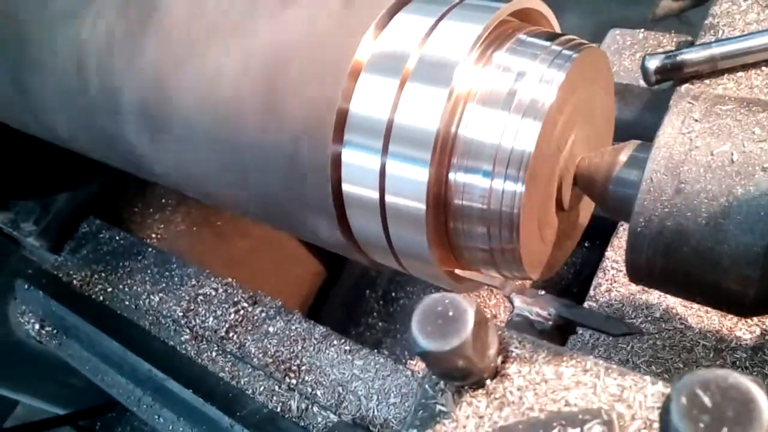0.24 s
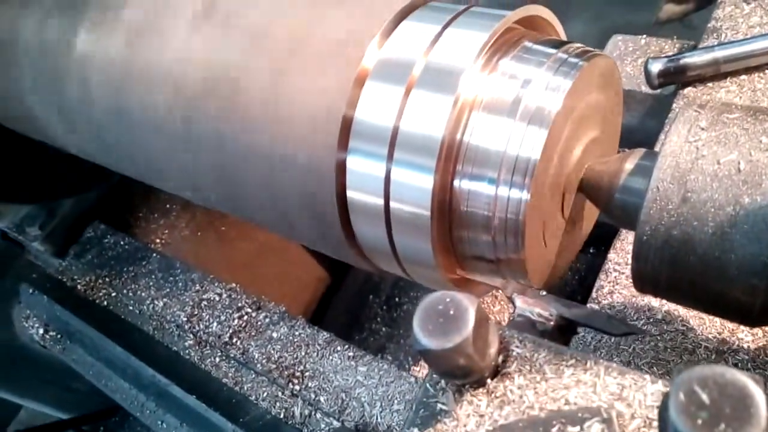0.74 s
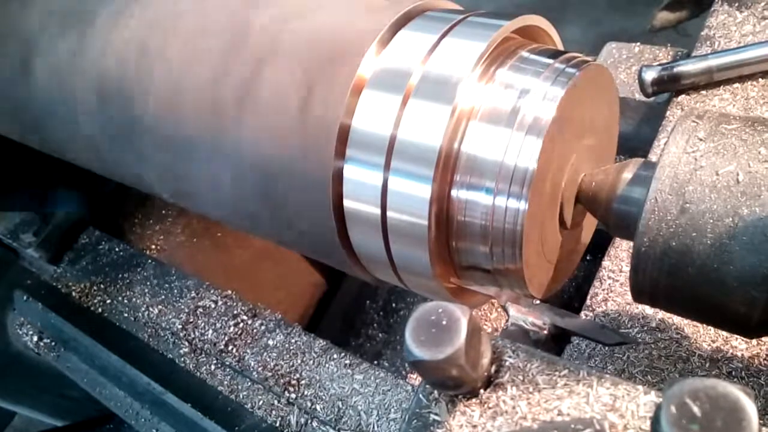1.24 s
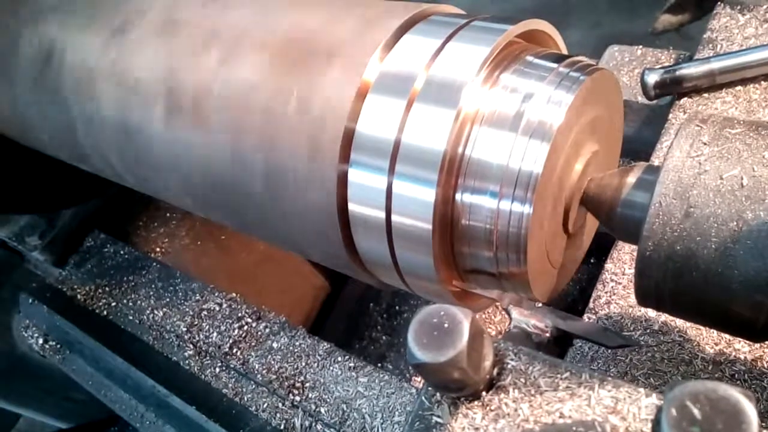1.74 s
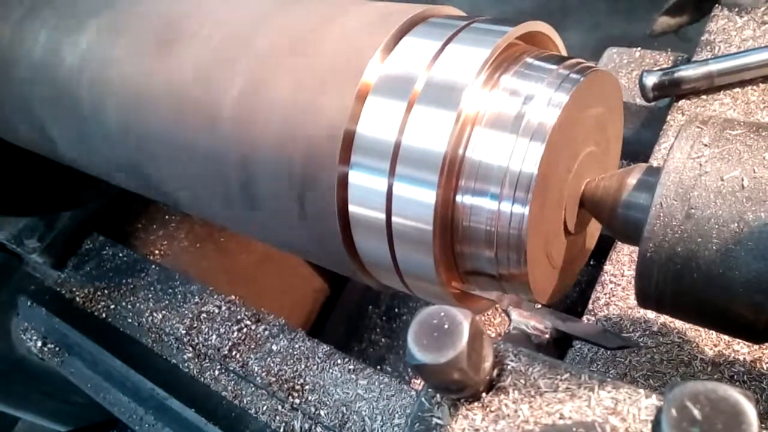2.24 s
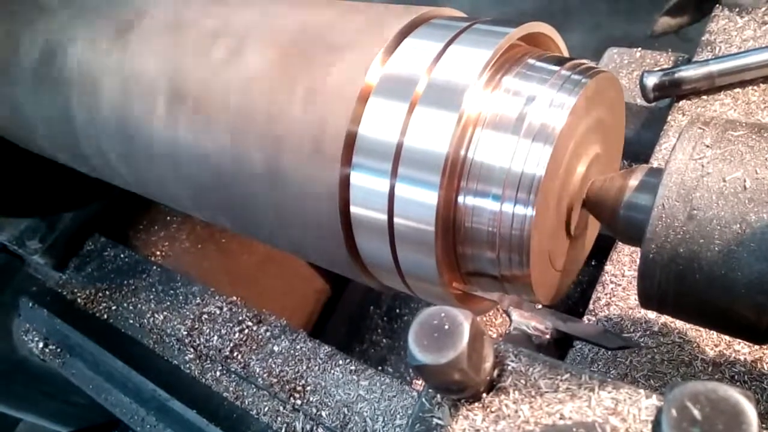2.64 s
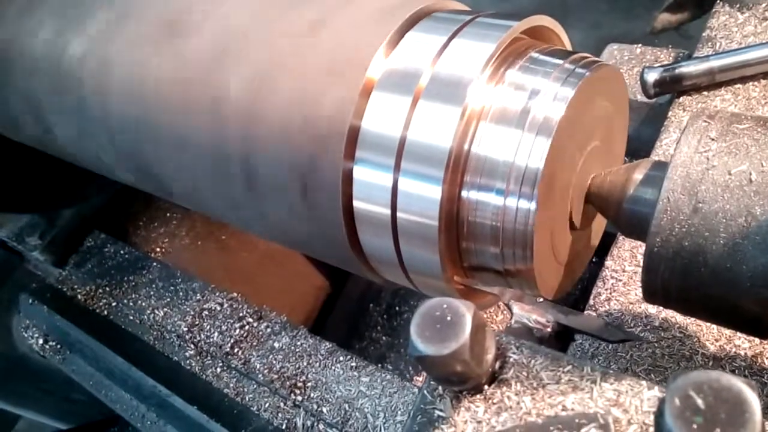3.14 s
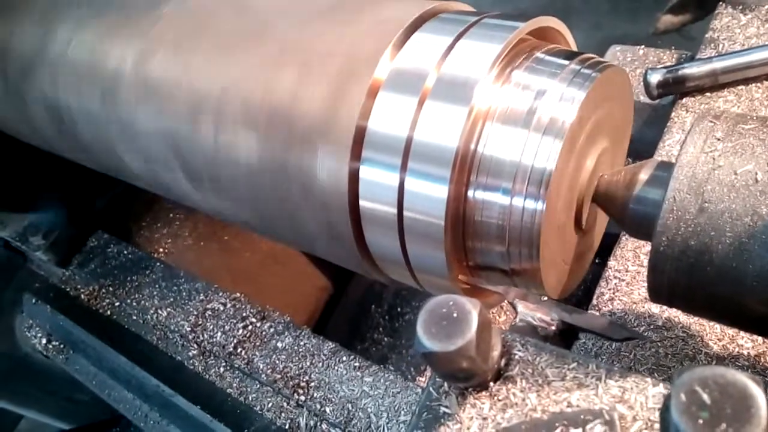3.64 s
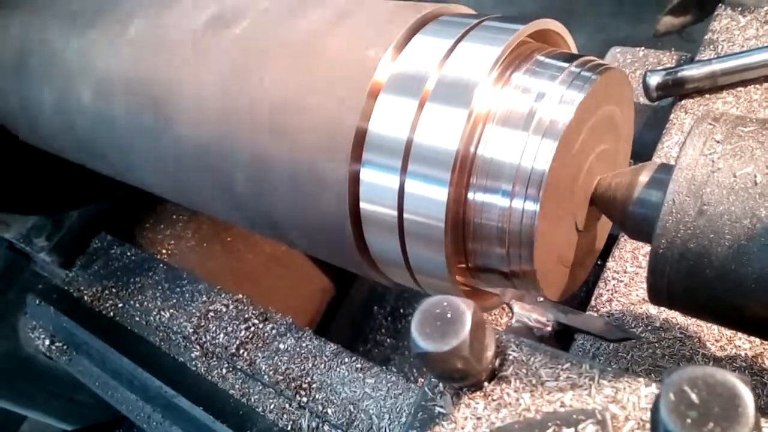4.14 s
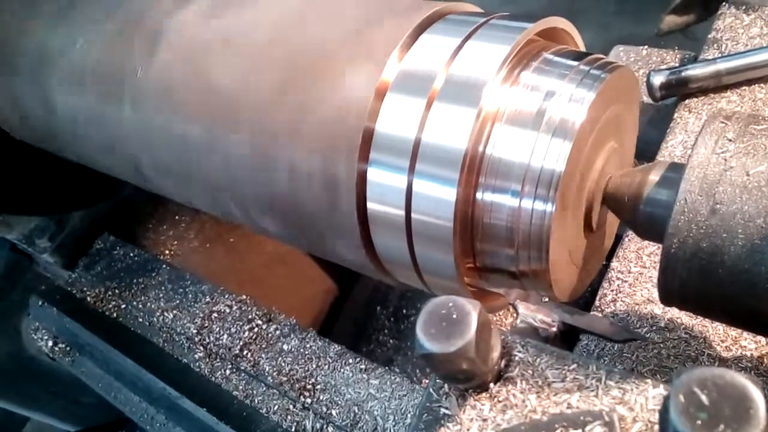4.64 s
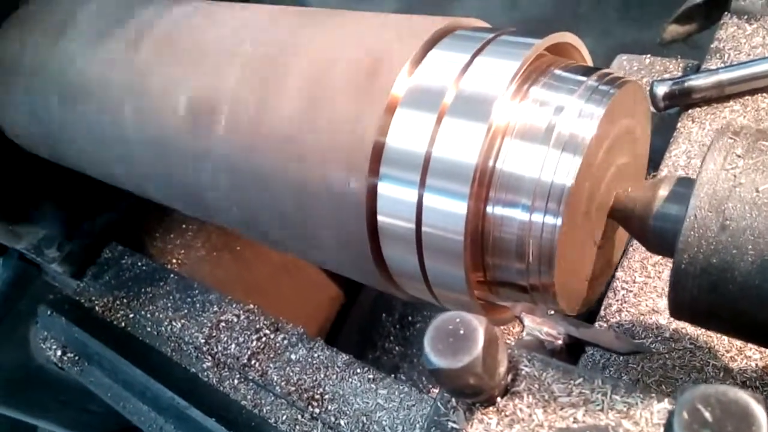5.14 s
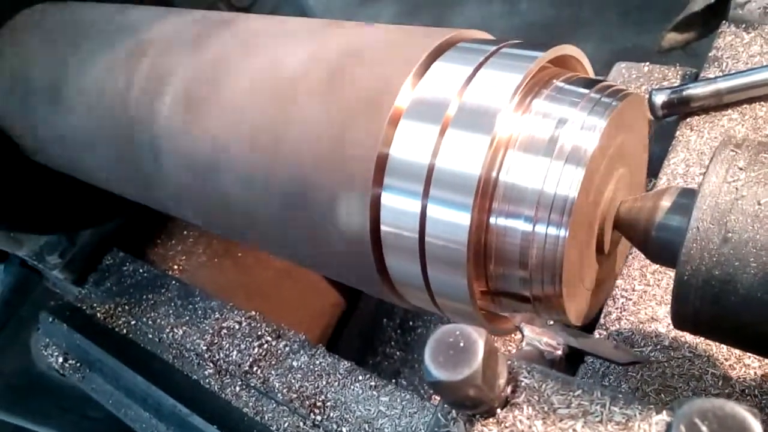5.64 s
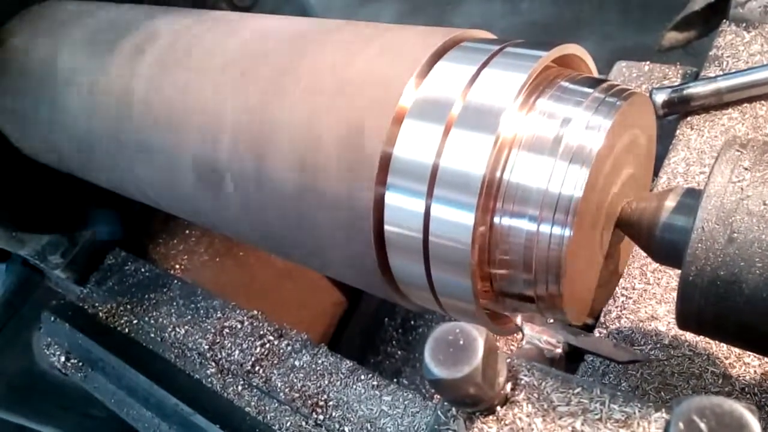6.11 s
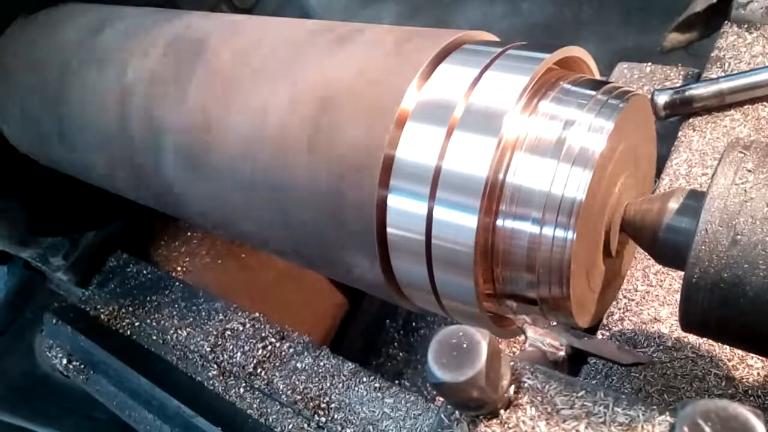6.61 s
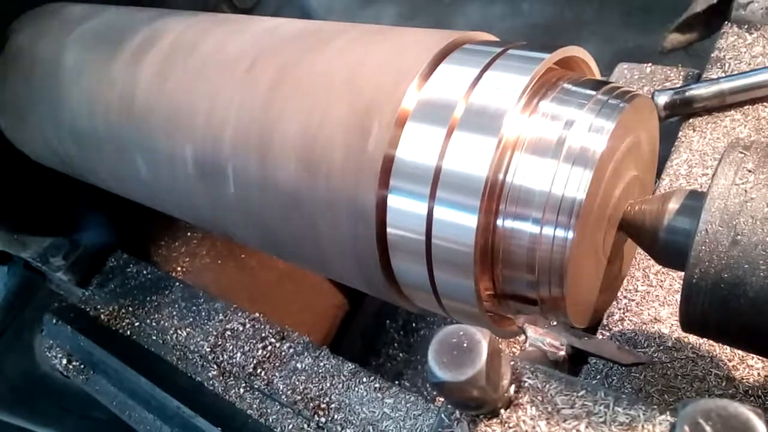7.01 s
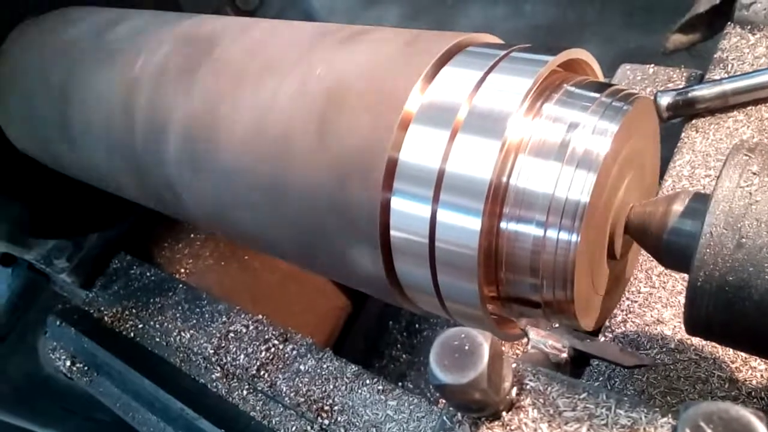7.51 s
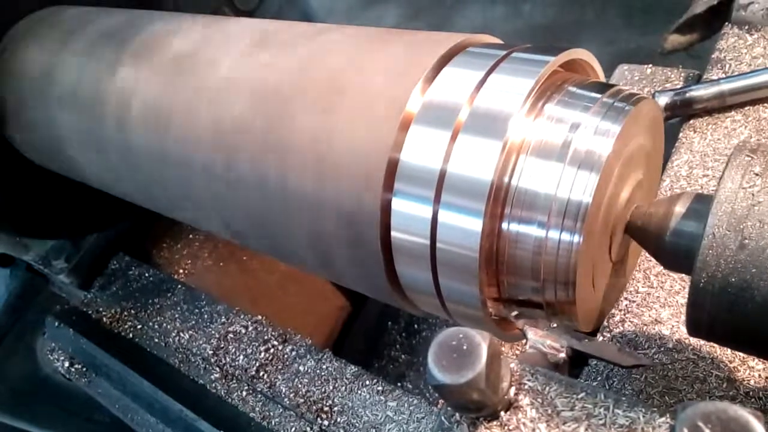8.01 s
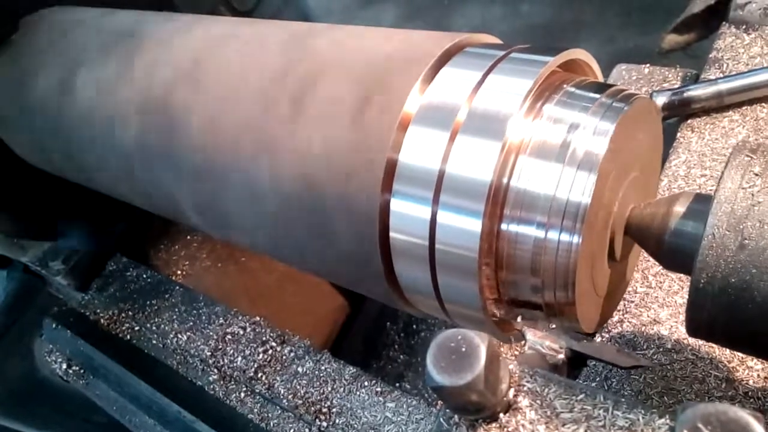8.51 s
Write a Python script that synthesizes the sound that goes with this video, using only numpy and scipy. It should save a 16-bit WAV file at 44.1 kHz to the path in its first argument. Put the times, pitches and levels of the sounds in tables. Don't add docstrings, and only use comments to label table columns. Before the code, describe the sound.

A lathe idles with a steady rumbling hum, then a blade bites spinning metal in two harsh, piercing, wavering squeals with a brief pause between.

```python
import sys
import numpy as np
from scipy import signal
from scipy.fft import rfft, irfft, next_fast_len
from scipy.io import wavfile
from scipy.ndimage import uniform_filter1d

SR = 44100
rng = np.random.default_rng(int(sys.argv[2]) if len(sys.argv) > 2 else 0)


def dump_mix(stems):
    frames = np.atleast_2d(stems).T
    limited = np.clip(frames, -1, 1)
    pcm = np.round(limited * 32767).astype(np.int16)
    wavfile.write(sys.argv[1], SR, pcm)


def gain_from_db(level_db):
    decades = np.asarray(level_db, float) / 20
    return 10 ** decades


N = 386316
CUT_FROM = int(5.45 * SR)

# f/Hz, level/dB [per Hz]
RUMBLE = [(25, -22), (70, -17.5), (108, -12), (161, -11), (202, 0.5), (246, -5.5), (404, -7), (545, -5.5),
          (720, -9.5), (1010, -9.5), (1630, -10), (2300, -19.5), (3000, -60)]
# f/Hz, level/dB [per Hz]
HISS = [(1800, -22), (2300, -1), (3300, 0.5), (4000, -2.5), (4600, -5), (4950, -15), (5250, -10),
        (5600, -15), (6250, -8), (6600, -13), (7000, -23), (7600, -26.5), (8300, -41.5), (10500, -67)]
# f/Hz, width/Hz, level/dB
CASING = [(202.5, 11.6, -5.5), (322, 17, -4), (456, 29, -2), (576.4, 64, -1.5), (798, 32, -9.5),
          (1269, 39, -5), (1455, 33, -6), (1580, 56, -5.5), (1882, 94, -9.5)]
# f/Hz, level/dB [rms]
GEAR_TONES = [(51, -56), (99, -53), (126, -52.5), (199, -41), (484.5, -48.5), (850.6, -46.5), (969, -43.5),
              (1068, -58), (1168, -47), (1577, -46.5), (1690, -51), (1748, -47.5), (2073, -51), (2169, -56),
              (3149, -54)]
# t/s, level/dB [rms]
LOAD_HUM = [
    (0, -70),
    (6.6, -49),
    (6.9, -47.5),
    (8.76, -49),
]
TICK_S = np.array([.002, 1.1973])

# t/s, depth of cut as level/dB, flex/dB [push passed on to holder and ring]
CUTS = [
    [(5.52, -73, -1), (5.594, -34.5, -10), (5.85, -20, -7), (5.93, -10.5, 4), (6.4, -9.5, -1.5),
     (6.74, -7, 0.5), (6.9, -20, -10), (7.165, -29, 7), (7.24, -91, 0)],
    [(7.49, -75, -8), (7.575, -34, 3), (7.928, -25, 12), (8.0, -16.5, 10), (8.33, -17, -1),
     (8.355, -9.5, -9), (8.47, -11, -1), (8.58, -17, 2.5), (8.76, -16.5, 2)],
]
# level/dB [at full depth], slope/dB [per dB of depth], share of the flex
FOLLOW = [
    (-16, 2.5, 0.95),
    (-15, 1.05, .6),
    (-12.5, 2, 0.41),
    (-9, 1.25, 0),
    (-18, 0.92, 0),
]
PART_EDGES_HZ = (1350, 2130, 5480, 5990, 7390, 8590)
# f/Hz, width/Hz, level/dB
RING = [(1485, 71, -17), (1595, 45, -2), (1652, 71, -3), (1767, 99, 0), (1880, 28, -10), (1990, 49, -3.5),
        (2310, 110, -14)]
# f/Hz, width/Hz, level/dB
HOLDER = [(2694, 49, -13.5), (3095, 37, -10.5), (3540, 140, -9.5), (4007, 94, -1), (4314, 64, 0.5),
          (4300, 36, -13), (4580, 110, 2), (5050, 72, -4), (5270, 83, -6), (5480, 140, 2)]
# f/Hz, width/Hz, level/dB
SHANK = [(5280, 200, -11), (5940, 200, 4)]
# f/Hz, width/Hz, level/dB
BLADE = [(5700, 33, 1), (6230, 69, -1.5), (6320, 23, -5), (6450, 82, -2), (6630, 84, -5.5), (6890, 170, -7)]
# f/Hz, width/Hz, level/dB
TIP = [(7440, 64, 2.5), (7520, 49, 0), (7670, 83, -24), (7910, 120, -0.5), (8330, 125, -4.5)]
# f/Hz, width/Hz, level/dB
CURL = [(9100, 360, -0.5), (10140, 150, -2), (10800, 300, -3.5), (10900, 110, -11), (11370, 760, -4),
        (12600, 300, -14), (13100, 150, -12)]
# f/Hz, level/dB [per Hz]
SHEAR = [(710, -62), (1200, -46), (1650, 3), (2030, -7), (2160, -14), (2450, -15.5), (2650, -14),
         (3310, -13.5), (4370, -5.5), (4810, -16), (6290, -1.5), (7070, -16), (7700, -17), (9040, -34),
         (15400, -52)]

# t/s, length/s, start f/Hz, end f/Hz, peak level/dB
SLIDES = [(6.133, .07, 2760, 2680, -13), (6.19, .05, 2700, 3150, -20), (6.173, 0.037, 4150, 4050, -10),
          (6.203, 0.11, 1450, 1400, -17.5), (6.88, 0.12, 5600, 4800, -29), (6.992, 0.2, 4350, 3950, -37),
          (7.62, 0.2, 6100, 6090, -33), (7.8, .14, 6090, 6080, -29), (5.6, .12, 6050, 5980, -38),
          (6.1, .1, 5000, 5600, -20), (6.2, .1, 4300, 3800, -21), (6.06, 0.12, 5500, 6400, -20),
          (5.86, .1, 2740, 2730, -25), (6.77, 0.12, 4200, 4150, -21), (8.34, 0.095, 1980, 2150, -21),
          (7.8, .15, 5200, 4850, -31), (8.62, .13, 2150, 2300, -28), (8.56, 0.16, 2660, 2660, -31),
          (7.16, .14, 1800, 1600, -33), (6.236, .19, 5975, 6158, -13), (6.41, .12, 1614, 1700, -7),
          (8.2, .3, 2300, 2200, -30), (8.491, .26, 4317, 4091, -27)]
# t/s, length/s, f/Hz, peak level/dB
RING_LOCKS = [(5.857, .2, 1981, -24), (5.885, .08, 1700, -17), (5.961, .14, 1720, -16),
              (5.996, .22, 1620, -18), (6.151, .13, 1965, -21), (6.455, .15, 1825, -17),
              (6.545, .15, 1980, -20), (6.575, .2, 1695, -12), (6.76, .12, 1857, -20),
              (6.775, .24, 1685, -25), (7.089, .09, 1566, -16), (7.987, .15, 1965, -19),
              (8.002, .11, 1496, -26), (8.181, .24, 1668, -26), (8.261, .11, 1835, -21),
              (8.426, .11, 2018, -16), (8.446, .19, 1647, -22), (8.58, .09, 1835, -21),
              (8.625, .08, 1610, -22)]
# t/s, length/s, f/Hz, peak level/dB
HOLDER_LOCKS = [(5.662, .2, 4495, -37), (5.887, .21, 4430, -19), (5.927, .26, 2712, -24),
                (6.051, .08, 5135, -17), (6.161, .16, 4750, -22), (6.236, .08, 3762, -21),
                (6.366, .08, 5265, -20), (6.52, .08, 4505, -18), (6.67, .18, 4100, -20),
                (6.73, .18, 2670, -26), (6.755, .13, 4575, -23), (7.074, .09, 3120, -30),
                (7.668, .19, 4548, -33), (7.882, .2, 4435, -31), (8.127, .25, 2670, -28),
                (8.341, .08, 4516, -17), (8.506, .1, 4280, -21), (8.595, .17, 4532, -23),
                (8.7, .07, 5097, -22), (6.251, .1, 2664, -27), (7.039, .12, 4796, -33),
                (7.588, .2, 4195, -40), (8.171, .11, 5296, -27), (8.416, .2, 5668, -26),
                (8.67, .1, 2670, -28), (8.725, .05, 4806, -26), (8.39, .1, 2680, -30),
                (6.85, .12, 2680, -30), (6.87, .07, 4100, -27)]
# t/s, length/s, f/Hz, peak level/dB
BLADE_LOCKS = [(5.567, .2, 6384, -33), (5.667, .13, 6502, -28), (5.707, .11, 5975, -29),
               (5.732, .08, 6390, -19), (5.902, .1, 6346, -8), (5.961, .12, 6018, -13),
               (6.001, .19, 6271, -9), (6.181, .1, 6390, -10), (6.505, .09, 6513, -11),
               (6.57, .11, 6341, -9), (6.695, .19, 6061, -20), (6.859, .21, 6400, -28),
               (6.864, .08, 6152, -22), (6.984, .17, 6078, -25), (7.004, .07, 5926, -21),
               (7.613, .17, 6540, -37), (7.673, .09, 6147, -27), (7.752, .07, 6066, -26),
               (7.817, .1, 6384, -28), (7.957, .09, 5990, -18), (8.027, .12, 6411, -17),
               (8.117, .14, 6082, -16), (8.151, .23, 6556, -18), (8.336, .17, 6357, -11),
               (8.371, .11, 6007, -15), (8.521, .15, 6180, -17), (8.635, .08, 6030, -16),
               (8.665, .1, 6368, -22), (8.27, .06, 6520, -15), (8.401, .24, 6560, -21)]
CHANCE_S = (.08, 0.17)


def rms_one(x):
    return x / np.sqrt(np.mean(x ** 2) + 1e-20)


def drift(rate, size=N):
    r = np.exp(-40 * np.pi * rate / SR)
    settle = 4000
    noise = rng.standard_normal(size // 20 + settle + 2)
    slow = signal.lfilter([1], [1, -2 * r, r * r], noise)[settle:]
    return np.interp(np.arange(size) / 20, np.arange(len(slow)), slow / (slow.std() + 1e-20))


def coloured(x, spectrum):
    hz, db = np.transpose(spectrum)
    size = next_fast_len(len(x))
    bins_hz = np.maximum(np.fft.rfftfreq(size, 1 / SR), 1)
    gain = gain_from_db(np.interp(np.log(bins_hz), np.log(hz), db))
    return rms_one(irfft(rfft(x, size) * gain, size)[:len(x)])


def resonance(x, hz, width):
    r = np.exp(-np.pi * width / SR)
    poles = [1, -2 * r * np.cos(2 * np.pi * hz / SR), r * r]
    return signal.lfilter(np.array([1, 0, -1]) * (1 - r * r) / 2, poles, x)


def body(x, modes, patchy_db, rate):
    out = np.zeros(len(x))
    for k, (hz, width, db) in enumerate(modes):
        coupling = gain_from_db(db + patchy_db * drift(rate, size=len(x)))
        ringing = resonance(resonance(x, hz, width), hz, 4 * width)
        out += (-1) ** k * coupling * ringing
    return rms_one(out)


def headstock():
    rumble = coloured(rng.standard_normal(N), [*RUMBLE, (SR / 6, -120)]) * gain_from_db(0.14 * drift(21))
    hiss = coloured(rng.standard_normal(N), [*HISS, (SR / 3, -90)]) * gain_from_db(0.95 * drift(29))
    dull = signal.butter(8, 2600, fs=SR, output="sos")
    casing = body(signal.sosfilt(dull, rng.standard_normal(N)), CASING, patchy_db=0.0, rate=1.3)
    return gain_from_db(-29) * rumble + gain_from_db(-32) * casing + gain_from_db(-38) * hiss


def gear_tones():
    t = np.arange(N) / SR
    out = np.zeros(N)
    for hz, db in GEAR_TONES:
        sway = min(hz / 300, 1.2) * drift(3.14)
        level = np.sqrt(2) * gain_from_db(db + 3.15 * drift(4.3))
        out += level * np.sin(2 * np.pi * hz * t + sway)
    return out


def labouring_spindle():
    t = np.arange(N) / SR
    level = gain_from_db(np.interp(t, *np.transpose(LOAD_HUM)) + 1.9 * drift(1.7))
    return np.sqrt(2) * level * np.sin(2 * np.pi * 84.0 * t + 0.31 * drift(3.4))


def ticks():
    out = np.zeros(N)
    out[(np.array(TICK_S) * SR).astype(int)] = gain_from_db(-27)
    return out


def workshop(x, t60=0.54, wet_db=-14):
    t = np.arange(int(.5 * SR)) / SR
    tail = rng.standard_normal(len(t)) * gain_from_db(-60 * t / t60) * (t > .006)
    tail = signal.sosfilt(signal.butter(2, 7000, fs=SR, output="sos"), tail)
    tail /= np.sqrt(np.sum(tail ** 2))
    return x + gain_from_db(wet_db) * signal.fftconvolve(x, tail)[:len(x)]


def part_db(s, k):
    at, depth_db, flex_db = np.transpose(np.vstack(CUTS))
    full_db, slope, share = FOLLOW[k]
    below_full_db = np.interp(s, at, depth_db, left=-90) + 9
    return full_db + slope * below_full_db + share * np.interp(s, at, flex_db)


def chance_locks(k, modes, count, under_db=-1.5, detune=.012):
    jitter, pick, long, off = rng.random((count, 4)).T
    s = CUT_FROM / SR + (N - CUT_FROM) / SR * (np.arange(count) + jitter) / count
    mode_hz = np.array(modes)[(pick * len(modes)).astype(int), 0]
    hz = mode_hz * (1 + detune * (2 * off - 1))
    length = CHANCE_S[0] + long * (CHANCE_S[1] - CHANCE_S[0])
    db = np.minimum(part_db(s, k), part_db(s + length, k)) + under_db
    return np.transpose([s, length, hz, db])


def locks():
    faint = chance_locks(4, TIP, count=26)
    s, length, hz, db = np.vstack([RING_LOCKS, HOLDER_LOCKS, BLADE_LOCKS, faint]).T
    glide = .003 * rng.standard_normal(len(s))
    return np.transpose([s, length, hz * (1 - glide), hz * (1 + glide), db])


def squeals():
    bend, slip_rad = .002, .8
    out = np.zeros(N + SR)
    wander, flutter, sway = drift(48.0), drift(50), drift(12.4)
    for (s, length, start_hz, end_hz, db), skip in zip([*SLIDES, *locks()], rng.random(200)):
        size, at = int(1.3 * length * SR), int((s - .15 * length) * SR)
        u = np.arange(size) / size
        offset = int(skip * (N - SR))
        here = slice(offset, offset + size)
        hz = (start_hz + (end_hz - start_hz) * u) * (1 + bend * sway[here])
        phase = 2 * np.pi * np.cumsum(hz) / SR + slip_rad * wander[here]
        swell = np.sin(np.pi * u) ** 0.81 * gain_from_db(db - 2.0 + 4.1 * flutter[here])
        out[at:at + size] += swell * np.sin(phase)
    return out[:N]


def chips(per_s, spread_db):
    size = N - CUT_FROM
    sizes = gain_from_db(spread_db * np.minimum(rng.exponential(1, size), 4)) * rng.choice([-1, 1], size)
    return rms_one(sizes * (rng.random(size) < per_s / SR))


def cutting():
    s = np.arange(CUT_FROM, N) / SR
    shear = coloured(chips(per_s=10000, spread_db=4.0), SHEAR)
    throb = gain_from_db(0.82 * drift(5, size=len(s)) + 1.5 * drift(75, size=len(s)))
    cut = np.zeros(len(s))
    broad_db = (-6.5, -6.0, -9, -6.5, -3.5)
    for k, modes in enumerate((RING, HOLDER, SHANK, BLADE, TIP)):
        band = signal.butter(3, PART_EDGES_HZ[k:k + 2], "band", fs=SR, output="sos")
        ringing = body(chips(per_s=6000, spread_db=4.5), modes, patchy_db=5.5, rate=8.2)
        broad = rms_one(signal.sosfilt(band, shear))
        part = gain_from_db(-2) * signal.sosfilt(band, ringing) + gain_from_db(broad_db[k]) * broad
        cut += gain_from_db(part_db(s, k) - 1.0) * part * throb
    curl = body(chips(per_s=4600, spread_db=-1.5), CURL, patchy_db=2.5, rate=7.0)
    cut += gain_from_db(0.91 * part_db(s, k=4) - 19.5) * curl * throb
    top = signal.butter(4, (12800, 15500), "band", fs=SR, output="sos")
    sizzle = rms_one(signal.sosfilt(top, chips(per_s=2500, spread_db=4.0)))
    cut += gain_from_db(2 * part_db(s, k=3) - 28) * sizzle
    return cut


def scene():
    out = headstock() + gear_tones() + labouring_spindle() + ticks()
    out[CUT_FROM:] += workshop(squeals()[CUT_FROM:] + cutting())
    return out[None]


def low_pass(x):
    return signal.sosfilt(signal.butter(12, 15570, fs=SR, output="sos"), x)


def record(dry):
    loud_db = 10 * np.log10(uniform_filter1d(dry ** 2, size=1500) + 1e-9)
    eased = dry * gain_from_db(-.4 * np.maximum(loud_db + 10.5, 0))
    clipped = np.clip(eased, -.95, .95)
    mix = clipped + gain_from_db(-88) * rng.standard_normal(dry.shape)
    return low_pass(mix)


dry = scene()
out = record(dry)
dump_mix(out)
```